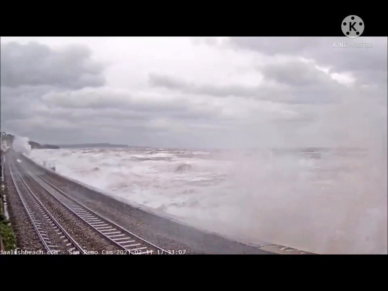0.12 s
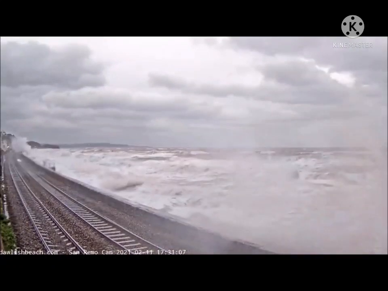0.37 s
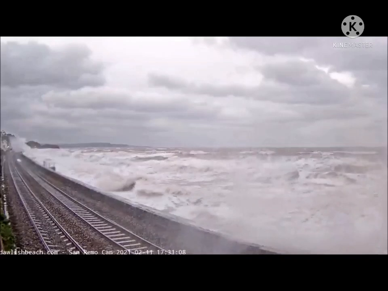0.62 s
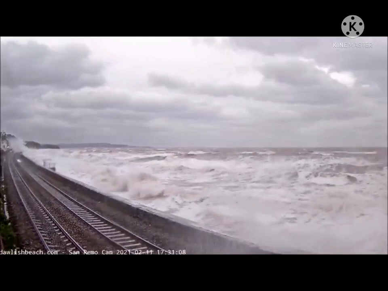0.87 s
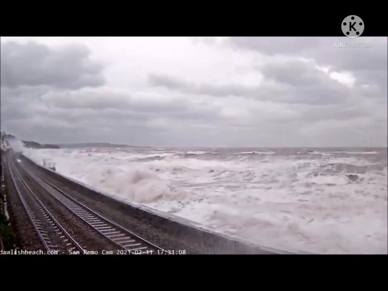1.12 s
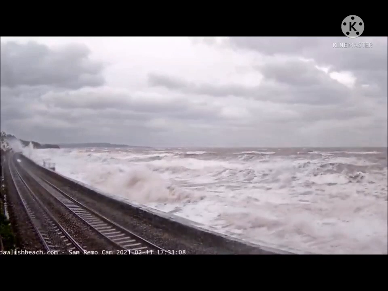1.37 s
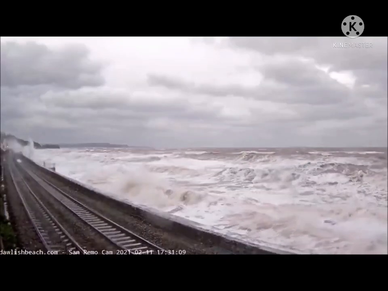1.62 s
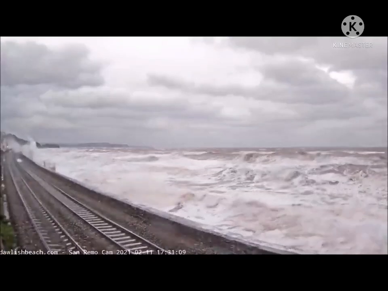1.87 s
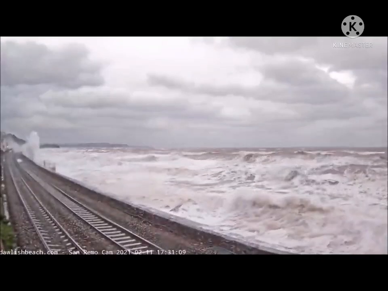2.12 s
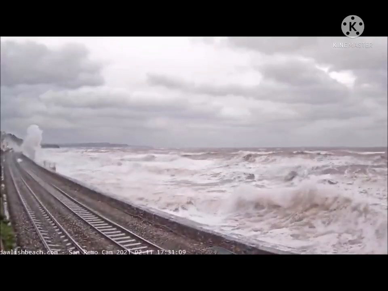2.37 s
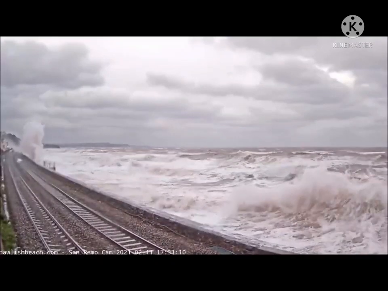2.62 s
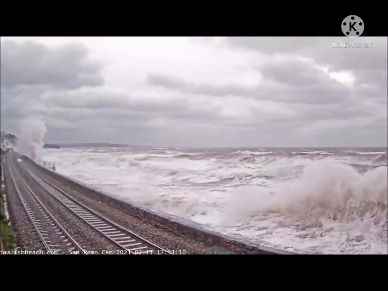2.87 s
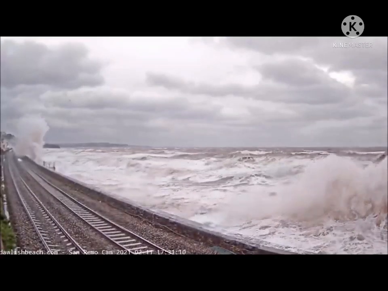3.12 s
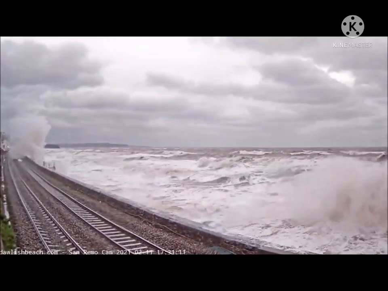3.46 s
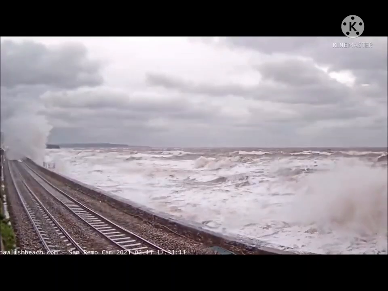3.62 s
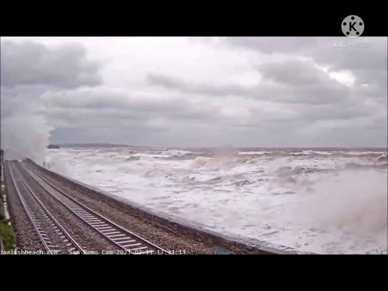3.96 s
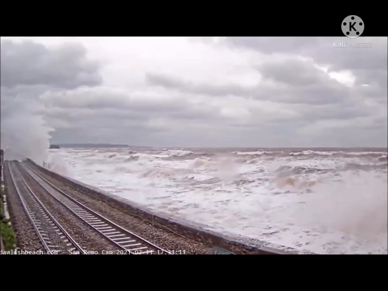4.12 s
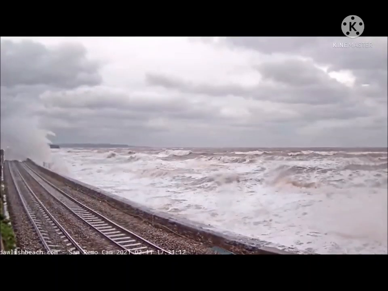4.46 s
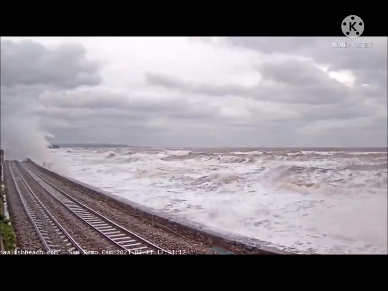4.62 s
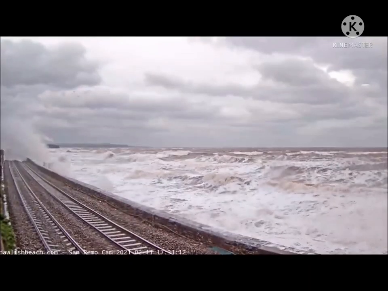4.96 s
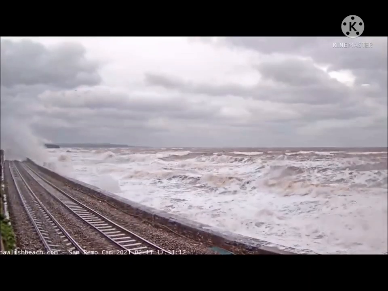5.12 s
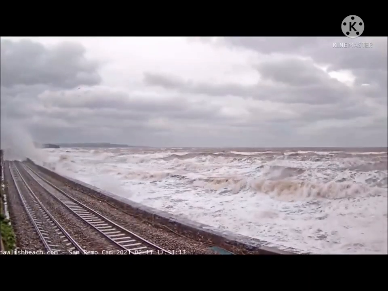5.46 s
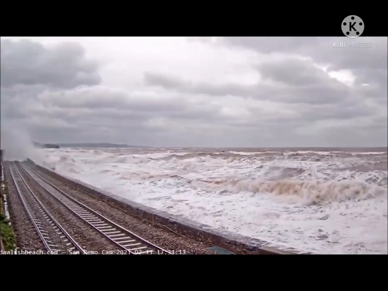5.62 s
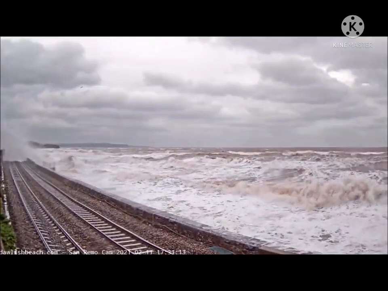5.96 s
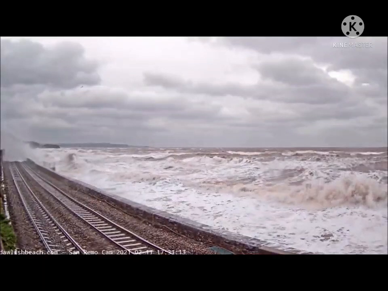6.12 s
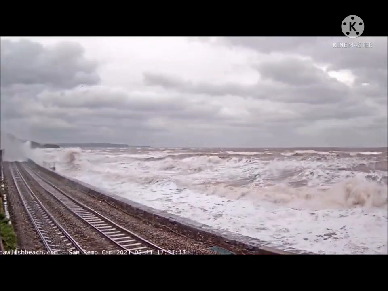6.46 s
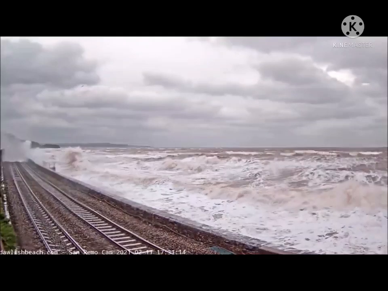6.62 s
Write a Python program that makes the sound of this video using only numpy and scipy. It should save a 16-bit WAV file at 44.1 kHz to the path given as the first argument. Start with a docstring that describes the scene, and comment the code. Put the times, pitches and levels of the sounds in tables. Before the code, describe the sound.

Storm surf roars and foams against a sea wall without a break. Early on, a bright shower of spray hisses down, then a gust gives the microphone one hard, low thump. A softer shower follows past the middle, and another breaker washes up near the end. Wind rumbles throughout. The microphone sits above the sea in a housing that makes the sound slightly hollow and glassy.

```python
"""Storm surf at a sea wall

Heard from above through one microphone in a weatherproof housing. Bubble clouds roar in the breakers,
small bubbles seethe in the foam, and blown spray comes down in showers of fine drops. Wind eddies buffet
the housing and gusts thump its mount, once hard. Now and then the treble dips to a brief glassy ring."""
import sys
import numpy as np
from scipy import signal
from scipy.fft import rfft, irfft, next_fast_len
from scipy.io import wavfile
from scipy.ndimage import uniform_filter1d

SR = 44100
rng = np.random.default_rng(int(sys.argv[2]) if len(sys.argv) > 2 else 0)


def wav_out(sig):
    """Save sig, one row per channel (or a flat mono array), as 16-bit PCM at SR to the path in sys.argv[1]."""
    wavfile.write(sys.argv[1], SR, np.round(np.clip(np.atleast_2d(sig).T, -1, 1) * 32767).astype(np.int16))


N = 299828
TIME = np.arange(N) / SR
FREQS = np.maximum(np.arange(N // 2 + 1) * SR / N, 1)

# Spectra of the noise sources. Each row: frequency in Hz, relative spectral density in dB.
WIND_SPECTRUM = [(8, 5), (20, 1), (42, 0.5), (65, -8), (100, -21.5), (200, -21.5), (500, -99.5),
                 (2000, -100)]
SPRAY_SPECTRUM = [(1500, -52), (3500, -17), (4700, -1.5), (6000, 0.5), (7300, 2), (8300, 0), (9700, -7.5),
                  (11800, -15.5), (13200, -20), (15000, -30)]
FOAM_SPECTRUM = [(700, -5), (1500, 1), (2200, 1), (3000, -0.5), (3900, -1.5), (5200, -2), (7000, -5),
                 (9500, -16), (12000, -47), (15000, -44)]
CREST_SPECTRUM = [(250, -21.5), (450, -3.5), (600, 0), (740, 0), (840, -2), (940, -11.5), (1090, -10),
                  (1250, -16.5), (1700, -51), (6000, -90)]
ROAR_SPECTRUM = [(40, -1.5), (110, -1), (220, -2.5), (330, 0), (470, -3.5), (600, -8), (800, -23),
                 (1200, -36), (3000, -83)]
# Gusts over the steady wind. Each row: time of the peak in seconds, half length in seconds, level in dB.
GUSTS = [(0.464, 0.066, -32.5), (.58, .04, -36), (.9, 0.11, -39), (1.17, .05, -35), (1.28, .04, -39),
         (1.39, 0.06, -35), (2.1, 0.056, -35), (2.22, 0.034, -31.5), (2.53, .04, -43), (3.144, 0.032, -41),
         (3.348, 0.056, -37), (3.67, .04, -36), (3.878, 0.062, -37), (4.42, .06, -34.5), (4.66, 0.054, -35),
         (5.1, 0.11, -31.5), (5.298, 0.12, -33.5), (6.3, .13, -39), (6.48, 0.046, -36)]
# Modes of the mount. Each row: frequency in Hz, level in dB, time to decay by 60 dB in seconds.
MOUNT_MODES = [(21.3, -14.5, 0.49), (43.8, -24.5, 0.44), (65.6, -22.5, 0.36)]
# Sudden gusts on the mount. Each row: start in seconds, shudder gain in dB, puff gain in dB.
THUMPS = [(1.158, -17, -32), (1.378, -15, -31), (1.914, -0.5, -25.5), (5.025, -13, -42)]
# Resonances and cancellations of the housing. Each row: frequency in Hz, width in Hz, gain in dB.
HOUSING_BANDS = [(401.6, 93, 6.5), (1248, 125, -13), (1390, 120, -8), (1532, 76, 4.5), (2215, 40, 2),
                 (2500, 92, -3.5), (2690, 120, -9), (2850, 130, 2), (3285, 260, -12), (3820, 420, 0),
                 (5080, 320, 2.5), (5750, 900, -1.5), (6800, 91, -0.5), (6990, 250, 3), (7370, 91, 3.5),
                 (8000, 1100, -6), (8830, 540, 2), (10400, 370, -7), (12300, 350, 1)]
# Housing modes that the wash sets ringing. Each row: frequency in Hz, relative level in dB.
HOLLOW_MODES = [(1535, -6), (1860, -1), (2230, 0), (2880, -3), (3690, -2), (3960, 5), (4580, -4), (5210, 2)]
# Brief dips of the treble. Each row: centre in seconds, length in seconds, treble gain in dB,
# gain of the glassy ring in dB, its tilt in dB per octave.
DIPS = [(0.276, 0.023, -6, -4.5, -4), (0.363, 0.016, -15, -5, 7), (0.574, 0.016, -24, -2, 8),
        (0.698, .013, -15, 0.5, 6), (1.023, 0.013, -16, -1, 10), (1.063, 0.012, -17, -0.5, 4),
        (1.184, 0.034, -32, -1, 5), (1.673, 0.027, -26, -2, 1.5), (1.745, 0.014, -15, -3, -2),
        (1.878, 0.015, -19, -13, -5), (2.027, 0.02, -26, -0.5, -3.5), (2.05, 0.01, -16, -3, -6),
        (2.135, 0.015, -26, -3, -5), (3.178, 0.017, -17, -4, -10), (3.411, .014, -9, -1, 0),
        (3.864, .015, -10, -5, -2), (3.943, 0.018, -21, -5, 3), (4.008, 0.016, -17, -4.5, -2),
        (4.138, .015, -13, -3, 0), (4.246, 0.019, -10, -3.5, 0), (4.297, 0.031, -26, 1, 4),
        (4.584, .018, -11, -2.5, 3), (4.647, 0.013, -20, -4, 3), (4.812, 0.028, -19, -1, 0),
        (4.887, 0.021, -16, -0.5, 1), (4.991, .014, -16, -6, 0), (5.055, 0.018, -18, -3.5, -8.5),
        (5.462, 0.025, -13, -3.5, 0), (5.804, 0.024, -10, -3.5, -3), (5.845, .012, -11, -3, -7),
        (6.227, .013, -9, -3, 2), (6.337, 0.018, -9, -3, 1), (6.366, 0.035, -32, -1.5, -3),
        (6.403, 0.015, -11, -1.5, -3), (6.442, 0.016, -12, -4, -3), (6.505, 0.022, -15, -1, -4),
        (6.695, .018, -13, -3.5, 0.5)]
# Tones of the glassy ring. Each row: rough frequency in Hz, relative level in dB.
GLASSY_TONES = [(1560, 1.5), (1850, 0.5), (2170, 2), (2900, 2.5), (3780, 4), (4250, 0), (4720, 2.5),
                (5050, 5), (5280, 5.5), (5750, -2), (6500, 7), (6880, 2), (7150, 6), (7520, 4), (8550, 5),
                (9000, 2)]
# Single splashes in the foam. Each row: time of the peak in seconds, half length in seconds, level in dB.
SPLASHES = [(1.555, .025, -55), (4.098, .045, -54), (4.848, .025, -55.5), (6.54, .03, -54)]
# Waves washing up the wall. Each row: time of full spray in seconds, hold in seconds,
# rise of the spray in dB per second, foam level in dB, drop level in dB, mist level in dB.
WASHES = [(0.614, 0.88, 18, -53.5, -41.5, -38.5), (1.03, .04, 22, -56.5, -43, -42),
          (2.3, 0.34, 16, -69, -55, -68), (4.044, 0.79, 10, -57.5, -46.5, -51.5),
          (6.5, 0.19, 18, -51, -57, -52.5)]
# Breakers over the steady surf. Each row: time of full height in seconds, hold in seconds,
# crest level in dB, roar level in dB.
BREAKERS = [(0.023, 0.11, -45.5, -42), (0.567, .03, -50, -49), (0.783, .06, -47, -48),
            (1.035, 0.18, -48, -44.5), (1.18, .04, -53, -41.5), (1.432, 0.045, -51, -41.5),
            (1.692, .04, -47.5, -42.5), (1.93, 0.22, -48.5, -43.5), (2.5, 0.063, -53, -41.5),
            (2.9, 0.055, -72, -45), (3.938, 0.12, -46, -45.5), (4.26, 0.033, -45.5, -46.5),
            (4.472, 0.056, -48.5, -46), (4.798, .05, -52, -42.5), (5.015, .04, -47, -51),
            (5.165, 0.045, -56, -42), (5.448, 0.044, -64, -45.5), (6.12, 0.055, -48.5, -56),
            (6.347, 0.029, -43, -45), (6.522, 0.17, -43, -40)]

WIND_DB, SPRAY_DB, FOAM_DB, CREST_DB, ROAR_DB = -40.5, -59, -55, -48, -41   # between waves and gusts
DROP_SPREAD_DB = -1


def from_db(db):
    """Amplitude grows tenfold with every 20 dB."""
    return 10 ** (np.asarray(db) / 20)


def rms_one(x):
    """Division by the rms gives unit power."""
    return x / np.sqrt(np.mean(x ** 2) + 1e-20)


def high_passed(x, hz, order=4):
    """Filtering forward and backward keeps what lies above hz without phase shift."""
    return signal.sosfiltfilt(signal.butter(order, hz, "high", fs=SR, output="sos"), x)


def coloured(x, colour, band_hz):
    """Spectral weighting colours x; the part within the band has rms 1."""
    hz, db = np.transpose(colour)
    spectrum = rfft(x) * from_db(np.interp(np.log(FREQS), np.log(hz), db))
    inside = irfft(spectrum * (FREQS > band_hz[0]) * (FREQS < band_hz[1]), N)
    return irfft(spectrum, N) / np.std(inside)


def drift(rate_hz):
    """Low-passed noise wanders slowly; rms 1."""
    size = next_fast_len(N, real=True)
    hz = np.arange(size // 2 + 1) * SR / size
    return rms_one(irfft(rfft(rng.standard_normal(size)) / (1 + (hz / rate_hz) ** 2), size)[:N])


def churning(depth_db, rate_hz):
    """Countless bubbles sum to Gaussian noise, modulated as the water tumbles."""
    return rng.standard_normal(N) * from_db(depth_db * drift(rate_hz))


def impacts(per_s, spread_db):
    """Independent impacts of uneven size form shot noise; rms 1."""
    sizes = from_db(spread_db * np.minimum(rng.exponential(1, N), 5)) * rng.choice([-1, 1], N)
    return rms_one(sizes * (rng.random(N) < per_s / SR))


def swell(s, hold, rise_db_per_s, fall_db_per_s):
    """Exponential growth and decay are straight lines in dB, here either side of a hold at 0 dB."""
    return -rise_db_per_s * np.maximum(s - TIME, 0) - fall_db_per_s * np.maximum(TIME - s - hold, 0)


def power_sum(steady_db, swells_db):
    """Incoherent sounds add in power; the total is in dB."""
    return 10 * np.log10(from_db(steady_db) ** 2 + sum(from_db(db) ** 2 for db in swells_db))


def wind(edge_db=8.5, flutter_db=0.7):
    """Turbulent eddies press on the microphone port, each about as strong as the gust that carries it."""
    gusts = [db - edge_db * ((TIME - s) / half) ** 2 for s, half, db in GUSTS]
    wind_db = power_sum(WIND_DB, gusts) + flutter_db * drift(rate_hz=7)
    eddies = coloured(rng.standard_normal(N), WIND_SPECTRUM, (15, 90))
    running_rms = np.sqrt(uniform_filter1d(eddies ** 2, size=SR // 7))
    return from_db(wind_db) * eddies * (np.std(eddies) / running_rms)


def thumps(push_s=0.0094, puff_hz=70.7, puff_s=0.013):
    """A gust's pressure pulse excites the damped modes of the mount; higher modes decay sooner."""
    out = np.zeros(N)
    for s, shudder_db, puff_db in THUMPS:
        age = np.maximum(TIME - s, 0)
        shudder = sum(np.sin(2 * np.pi * hz * age) * from_db(db - 60 * age / t60)
                      for hz, db, t60 in MOUNT_MODES)
        puff = np.sin(2 * np.pi * puff_hz * age) * np.exp(-(age / puff_s - 1) ** 2)
        out -= (from_db(shudder_db) * shudder + from_db(puff_db) * puff) * (1 - np.exp(-age / push_s))
    return out


def housing(x, echoes=24, delay_s=(0.004, 0.016), echo_db=-13.5):
    """Faint reflections cross the housing; resonance lifts some pitches and interference cancels others."""
    lags, signs = rng.uniform(*delay_s, echoes), rng.choice([-1, 1], echoes)
    bright = high_passed(x, 1400)
    reflections = sum(sign * np.roll(bright, int(lag * SR)) for lag, sign in zip(lags, signs))
    x = x + from_db(echo_db) * reflections / np.sqrt(echoes)
    for hz, width, db in HOUSING_BANDS:   # a chain of peaking filters
        omega, gain = 2 * np.pi * hz / SR, from_db(db / 2)
        alpha = np.sin(omega) * width / (2 * hz)
        x = signal.lfilter([1 + alpha * gain, -2 * np.cos(omega), 1 - alpha * gain],
                           [1 + alpha / gain, -2 * np.cos(omega), 1 - alpha / gain], x)
    return x


def hollow_ring(half_width_hz=44, flicker_db=2.5):
    """Housing modes driven by the wash ring as narrow bands of noise, each wavering by itself; rms 1."""
    out = 0
    for hz, db in HOLLOW_MODES:
        band = signal.butter(2, [hz - half_width_hz, hz + half_width_hz], "band", fs=SR, output="sos")
        tone = rms_one(signal.sosfilt(band, rng.standard_normal(N)))
        out = out + tone * from_db(db + flicker_db * drift(rate_hz=9))
    return rms_one(out)


def glassy_ring(treble, age, length, tilt_db, count=11, scatter=0.0282, uneven_db=3.5):
    """A random cluster of inharmonic tones sounds glassy; each is weighted by the hiss near its pitch."""
    pitches, pitch_db = np.transpose(GLASSY_TONES)
    detune, lot, strength, phase, delay = rng.standard_normal((5, len(pitches)))
    hz = pitches * (1 + scatter * detune)
    spectrum = uniform_filter1d(np.abs(rfft(treble)), size=80)
    hiss = np.interp(hz * len(treble) / SR, np.arange(len(spectrum)), spectrum)
    gains = from_db(pitch_db + uneven_db * strength + tilt_db * np.log2(hz / hz[0])) * hiss ** 0.99
    sounding = np.argsort(lot) < count
    tones = np.sin(2 * np.pi * (age[:, None] * hz + phase)) * sounding * gains
    peak_s, bloom_s = 0.18 * length * delay, 0.01 + 0.31 * length   # each tone at its own moment
    blooms = np.exp(-((age[:, None] - peak_s) / bloom_s) ** 2)
    return np.std(treble) * (tones * blooms).sum(axis=1) / np.std(tones.sum(axis=1))


def treble_dips(sea, edge_hz=950, top_hz=7000, top_share=0.88):
    """Brief attenuation thins the treble while a glassy ring sounds in its place."""
    dip_db = sum(db * np.exp(-np.abs(2 * (TIME - s) / length) ** 3) for s, length, db, _, _ in DIPS)
    treble = high_passed(sea, edge_hz, order=6)
    top = high_passed(treble, top_hz, order=2)   # the highest hiss dips less
    out = sea - treble + (treble - top) * from_db(dip_db) + top * from_db(top_share * dip_db)
    for s, length, _, ring_db, tilt_db in DIPS:
        near = np.abs(TIME - s) < 0.08
        out[near] += from_db(ring_db) * glassy_ring(treble[near], TIME[near] - s, length, tilt_db)
    return out


def spray(drops_db, mist_db, drops_per_s=5000, drop_share=0.17, mist_hz=6200, spatter_db=-27):
    """Drop impacts make shot noise: mist hisses, heavier drops patter in sheets, the nearest ones tick."""
    sheets = from_db(0.79 * drift(rate_hz=14))
    patter = np.sqrt(drop_share) * impacts(drops_per_s * sheets, DROP_SPREAD_DB)
    rush = np.sqrt(1 - drop_share) * rng.standard_normal(N) * sheets
    shower = coloured(patter + rush, SPRAY_SPECTRUM, (5500, 12000))
    mist = high_passed(shower, mist_hz, order=3)
    ticks = coloured(impacts(per_s=970, spread_db=2), SPRAY_SPECTRUM, (5500, 12000))
    spatter = from_db(spatter_db) * rms_one(high_passed(ticks, 9500, order=2))
    return from_db(mist_db) * (mist + spatter) + from_db(drops_db) * (shower - mist)


def watery_ring(per_s=900, low_hz=1400, high_hz=4600, ring_cycles=65, spread_db=5):
    """Many short damped tones at random pitches give the hiss a watery ring; rms 1."""
    out = np.zeros(N + SR)
    for when, pitch, size in rng.random((int(per_s * N / SR), 3)):
        hz, start = low_hz + (high_hz - low_hz) * pitch, int(when * N)
        cycles = np.arange(int(ring_cycles * SR / hz)) * hz / SR
        db = spread_db * min(-np.log(1 - size), 3) - 60 * cycles / ring_cycles
        out[start:start + len(cycles)] += from_db(db) * np.sin(2 * np.pi * cycles)
    return rms_one(out[:N])


def foam(foam_db, sizzle_hz=3400):
    """Bursting bubbles radiate broadband noise; a stronger, nearer wash is brighter and rings more."""
    fizz = churning(depth_db=1.0, rate_hz=17) + 0.38 * impacts(per_s=2500, spread_db=DROP_SPREAD_DB)
    seethe = coloured(fizz, FOAM_SPECTRUM, (1500, 3000))
    wash_db = foam_db - np.median(foam_db)
    sizzle = (from_db(0.86 * wash_db) - 1) * high_passed(seethe, sizzle_hz)
    watery = from_db(-10.5 + 0.19 * wash_db) * watery_ring()
    hollow = from_db(-12.5 + 0.98 * wash_db) * hollow_ring()
    return from_db(foam_db) * (seethe + sizzle + watery + hollow)


def wash_levels(surge_db, foam_lag_s=0.076, mist_linger_s=0.031, fall_db_per_s=31.5, splash_edge_db=13):
    """Washes add in power to the steady foam, drops and mist; foam also follows the crests. All in dB."""
    foams = [db - splash_edge_db * ((TIME - s) / half) ** 2 for s, half, db in SPLASHES]
    showers, mists = [], []
    for s, hold, rise, foam_db, drops_db, mist_db in WASHES:
        foams.append(foam_db + swell(s + foam_lag_s, hold, rise_db_per_s=23, fall_db_per_s=fall_db_per_s))
        showers.append(drops_db + swell(s, hold, rise, fall_db_per_s))
        mists.append(mist_db + swell(s, hold + mist_linger_s, rise, fall_db_per_s))
    return (power_sum(FOAM_DB + 0.37 * surge_db, foams),
            power_sum(SPRAY_DB, showers), power_sum(SPRAY_DB, mists))


def breaker_levels():
    """Each breaker adds power to the steady roar and crests under one envelope. Levels in dB."""
    roars, crests = [], []
    for s, hold, crest_db, roar_db in BREAKERS:
        tumble_db = swell(s, hold, rise_db_per_s=54, fall_db_per_s=75)
        roars.append(roar_db + tumble_db)
        crests.append(crest_db + tumble_db)
    return power_sum(ROAR_DB, roars), power_sum(CREST_DB, crests)


def breakers(roar_db, crest_db):
    """Bubble clouds resonate by size: large ones roar, smaller ones in the crests sound an octave up."""
    roar = coloured(churning(depth_db=0.5, rate_hz=3.3), ROAR_SPECTRUM, (200, 600))
    crests = coloured(churning(depth_db=1.0, rate_hz=12), CREST_SPECTRUM, (600, 1100))
    return from_db(roar_db) * roar + from_db(crest_db) * crests


def scene():
    """Sea and wind superpose at one microphone; both channels carry it."""
    roar_db, crest_db = breaker_levels()
    foam_db, drops_db, mist_db = wash_levels(surge_db=crest_db - CREST_DB)
    sea = breakers(roar_db, crest_db) + foam(foam_db) + spray(drops_db, mist_db)
    mono = treble_dips(housing(sea)) + wind() + thumps()
    return np.array([mono, mono])


def record(dry, cutoff_hz=15100):
    """An elliptic low-pass filter cuts the highest treble steeply."""
    return signal.sosfilt(signal.ellip(10, 0.1, 80, cutoff_hz, fs=SR, output="sos"), dry)


dry = scene()
out = record(dry)
wav_out(out)
```